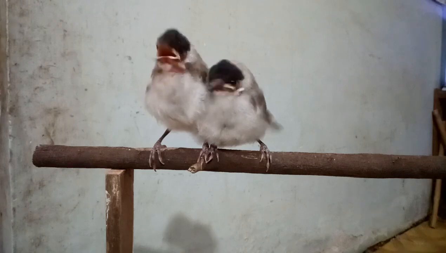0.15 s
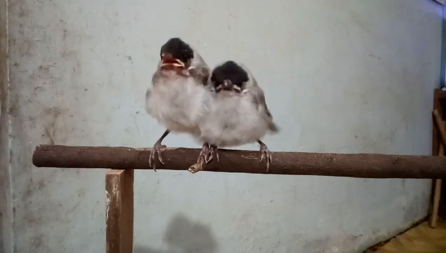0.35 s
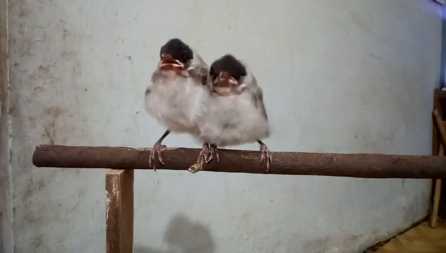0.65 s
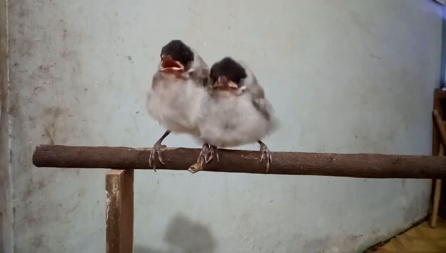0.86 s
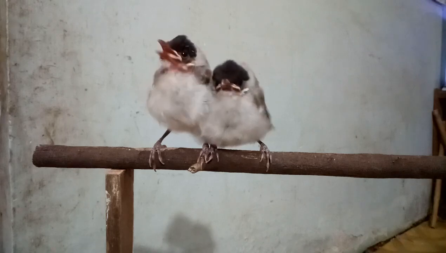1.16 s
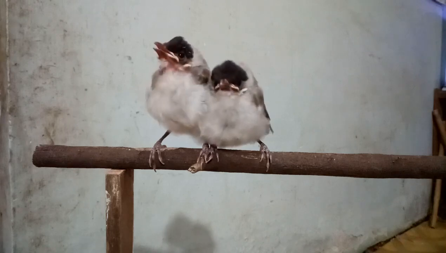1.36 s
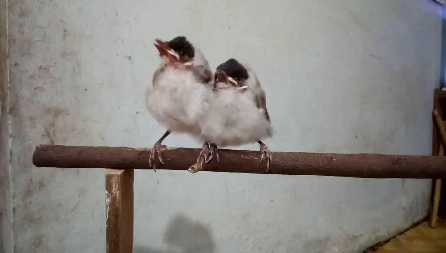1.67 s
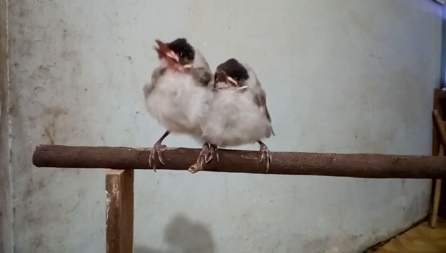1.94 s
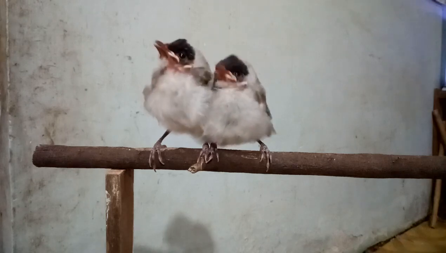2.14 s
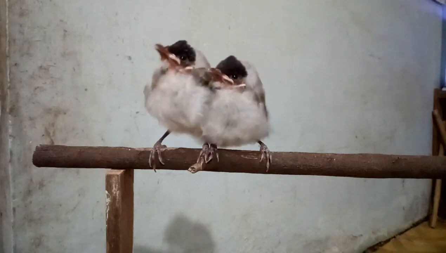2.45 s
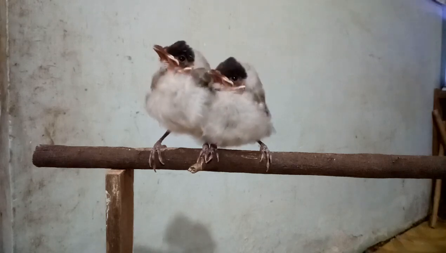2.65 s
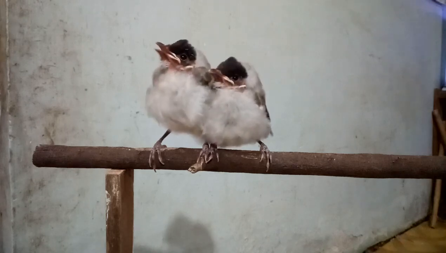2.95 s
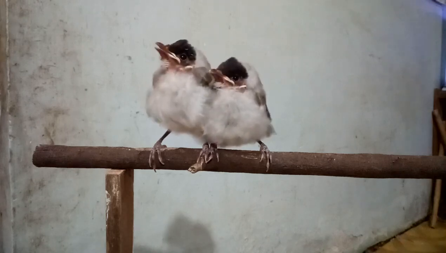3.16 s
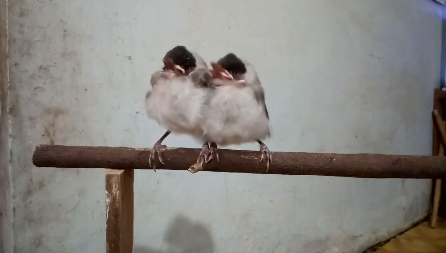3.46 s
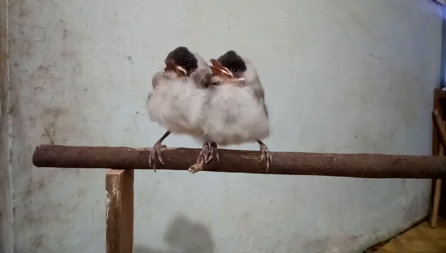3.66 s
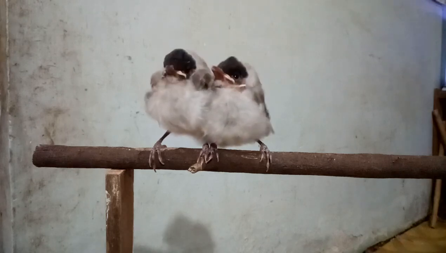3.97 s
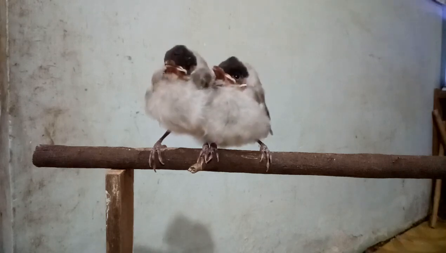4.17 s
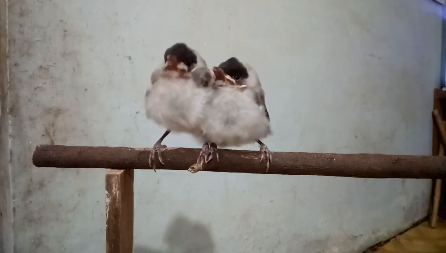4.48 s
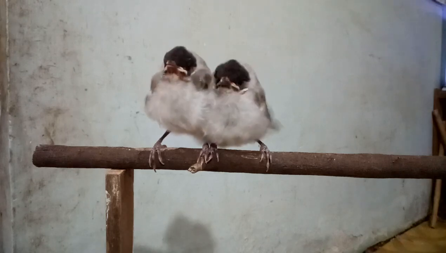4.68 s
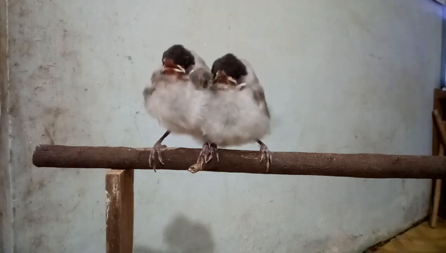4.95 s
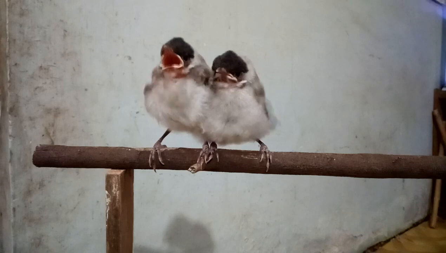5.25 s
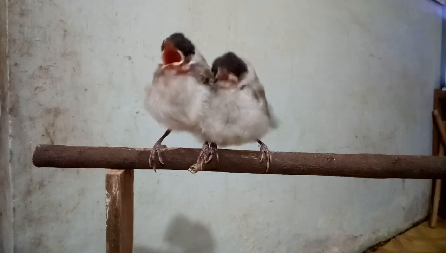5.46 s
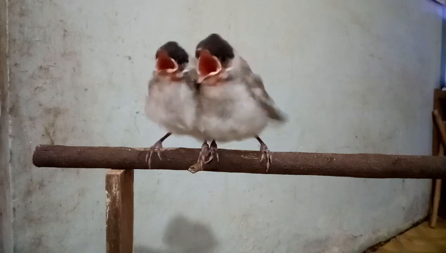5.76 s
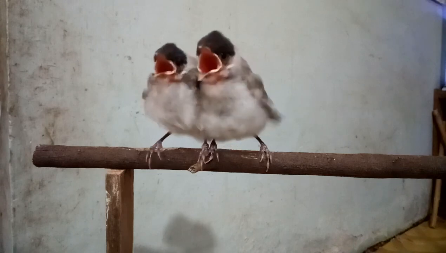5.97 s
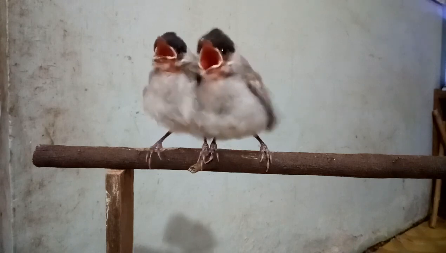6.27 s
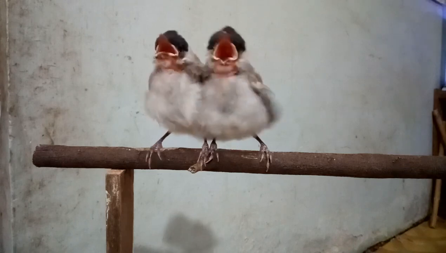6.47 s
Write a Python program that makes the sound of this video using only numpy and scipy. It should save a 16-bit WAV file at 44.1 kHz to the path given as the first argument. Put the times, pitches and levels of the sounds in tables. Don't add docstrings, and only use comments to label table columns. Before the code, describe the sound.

Two young birds on a wooden perch beg close to a phone microphone in a small bare room. One gives short shrill chirps, several a second with uneven gaps, varying between clear whistles, rising notes and raspy warbled cheeps. Near the end a second, fainter bird joins in and a soft bump sounds on wood. A steady low hum with slight buzz continues beneath.

```python
import sys
import numpy as np
from scipy import signal
from scipy.fft import rfft, irfft, next_fast_len
from scipy.io import wavfile
from scipy.ndimage import uniform_filter1d

SR = 44100
rng = np.random.default_rng(int(sys.argv[2]) if len(sys.argv) > 2 else 0)


def unload_wav(signal):
    wavfile.write(
        sys.argv[1],
        SR,
        np.round(np.clip(np.atleast_2d(signal).T, -1, 1) * 32767).astype(np.int16),
    )


def level_to_linear(level):
    exponent = np.asarray(level, float) / 20
    return 10 ** exponent


N = 291942
LEAD = 9000

# start in seconds, length in seconds, voice pitch in Hz, level in dB,
# pitch glide over the call as a share.
WHISTLES = [
    (.803, .055, 1881, -20, .05),
    (2.335, .053, 1945, -20.5, .06),
    (3.652, .05, 1913, -19.5, -.05),
    (5.053, 0.0524, 1888, -21, 0.013),
]
RISERS = [
    (1.866, 0.07, 1715, -19.5, .24),
    (3.083, .075, 1707, -23.5, .08),
    (4.243, .085, 1660, -21.5, .09),
]
SCOOPS = [(.269, 0.074, 1419, -22.5, 0.023), (2.182, 0.078, 1402, -19.5, 0.021),
          (2.438, 0.068, 1370, -18.5, 0.00099), (3.467, 0.078, 1391, -19, -.04),
          (4.448, .077, 1452, -19.5, -0.025), (4.645, 0.067, 1422, -18, .06)]
RATTLES = [(.897, 0.1, 1724, -23, .05), (3.812, 0.061, 1612, -20, -.04), (3.992, 0.051, 1495, -20, .02),
           (5.222, 0.08, 1662, -21, .15), (5.404, 0.091, 1489, -22, 0.048)]
DIVES = [(2.006, .066, 1557, -22.5, .04), (2.507, .059, 1571, -19.5, .01), (2.715, .053, 1415, -18, -.06),
         (6.437, .055, 1452, -21.5, -0.021)]
RASPS = [(-.17, .09, 1560, -26.5, .05), (.084, .08, 1400, -26.5, -.1), (1.085, .084, 1550, -20, .04),
         (1.305, .075, 1432, -23.5, -.11), (3.277, .072, 1515, -23, -.02), (5.607, .087, 1430, -23.5, -.09),
         (5.797, .079, 1450, -26.5, .01), (6.612, .05, 1718, -24, .01)]
SIBLING = [
    (6.158, 0.05, 2052, -31, 0.06),
    (6.28, .054, 1914, -31, .13),
    (6.35, .063, 1816, -25.5, 0.073),
    (6.496, 0.033, 1973, -26.5, -0.0095),
]

# pitch factor, level in dB, rasp in dB against the tone.
WHISTLE_SHAPE = [(1.14, -15, -4.5), (1.055, -7, -12), (.98, 0.5, -31.5), (.985, -0.2, -28.5),
                 (1.035, -1.5, -31), (.95, -4, -24)]
RISER_SHAPE = [(1.35, -23.5, -4), (0.88, -10.5, -3), (.99, -5.5, -10.5), (.985, -3, -17), (.98, -1.5, -20),
               (1.025, 1, -27.5), (1.005, -8.5, -28.5)]
SCOOP_SHAPE = [(1.57, -16, -8), (1.14, -8.5, -9), (.9, -4, -23.5), (1.04, 0, -24), (1.01, -3, -25),
               (1.01, -2.5, -25.5), (.96, 0.5, -19)]
RATTLE_SHAPE = [(1.06, -15, -9.5), (.99, -4, -9), (1.005, -1.5, -16.5), (.98, -0.3, -14.5),
                (.98, -1, -20.5), (1.02, -3.5, -18)]
DIVE_SHAPE = [(1.42, -10.5, -11.5), (.97, -4.5, -8), (.99, -2, -19.5), (.995, -1.8, -18.5),
              (1.01, -1.5, -19), (.99, -10, -16)]
RASP_SHAPE = [(1.27, -16.5, -3.5), (1.04, -7.5, -0.6), (1.01, -2.5, -7), (.99, 0, -14.5), (.98, 0.9, -17),
              (1.01, -6, -17.5)]
SIBLING_SHAPE = [(0.47, -3.5, -1), (1.01, -8, -4), (.99, -1, -13), (.995, -0.5, -22.5), (1.02, -5.5, -20.5)]

# calls, shape, lead-in in seconds, settling in seconds,
# partials 1, 3, 4 and 6 in dB against partial 2.
KINDS = [
    (WHISTLES, WHISTLE_SHAPE, .011, .013, -28.5, -30.5, -17, -38),
    (RISERS, RISER_SHAPE, 0.021, 0.0073, -23.5, -38.5, -20, -40),
    (SCOOPS, SCOOP_SHAPE, .011, .013, -26, -26.5, -15.5, -31),
    (RATTLES, RATTLE_SHAPE, .011, .013, -27, -31, -13, -29.5),
    (DIVES, DIVE_SHAPE, 0.012, .013, -24, -33, -15.5, -29),
    (RASPS, RASP_SHAPE, .011, .013, -23.5, -32, -15, -28.5),
    (SIBLING, SIBLING_SHAPE, .011, .012, -22.5, -25.5, -26, -74),
]

# time in seconds, partial 4 in dB.
FACING = [(0, 3), (.3, 7), (.9, 3), (1.3, 1), (2.0, -6), (2.2, 1.5), (2.45, -10), (2.55, 2.5), (2.75, -4.5),
          (3.1, 4.5), (3.3, -4.5), (3.85, -0.5), (4.3, -5), (4.7, -8.5), (5.25, 4.5), (5.45, 2.5),
          (5.65, 9.5), (6.62, 6.5)]

# first in seconds, last in seconds, count,
# first rise as a share, last rise as a share.
WARBLES = [(-.145, -.085, 6, 0.3, .3), (0.12, 0.149, 3, .2, 0.35), (0.943, 0.986, 5, .16, 0.31),
           (1.1192, 1.156, 3, 0.036, 0.27), (1.355, 1.371, 2, .12, 0.179), (2.03, 2.062, 3, 0.28, .27),
           (2.5171, 2.5609, 5, .16, .3), (2.7342, 2.7578, 3, 0.14, .22), (3.304, 3.3393, 5, 0.068, 0.22),
           (3.824, 3.8618, 5, .15, .3), (4.0065, 4.046, 5, .17, 0.29), (4.484, 4.5132, 2, 0.083, .18),
           (4.6948, 4.7132, 2, 0.22, 0.28), (5.2333, 5.2957, 7, 0.3, .09), (5.4186, 5.494, 8, 0.23, 0.19),
           (5.631, 5.6774, 6, .15, 0.29), (5.822, 5.876, 7, 0.22, 0.29), (6.182, 6.187, 2, 0.056, .13),
           (6.2912, 6.3244, 4, .31, .22), (6.383, 6.416, 4, .17, .11), (6.4494, 6.48, 4, .35, .25),
           (6.5035, 6.523, 2, .08, 0.14)]

# frequency in Hz, gain in dB.
THROAT = [(900, -30), (1500, -12), (2250, -6), (2700, -9.5), (4400, 9), (5150, -4), (5900, 6), (7500, -6),
          (8400, -13), (10000, 0.5), (15000, -28)]

# frequency in Hz, gain in dB.
RASP_COLOUR = [(1300, -32.5), (2000, -11.5), (2600, -6), (3300, 2.5), (4300, 11.5), (5200, -7),
               (6300, -5.5), (8300, -30.5), (10500, -33), (13000, -33), (15500, -53.5)]

# start in seconds, length in seconds,
# start pitch in Hz, end pitch in Hz, level in dB.
PEEPS = [(0.79, 0.023, 6200, 5300, -42.5), (0.88, 0.015, 4800, 4400, -42.5),
         (2.318, 0.035, 6450, 5500, -42), (3.005, 0.049, 4640, 4580, -73.5),
         (3.042, 0.048, 4460, 4240, -65.5), (3.64, 0.015, 5730, 5040, -47.5),
         (5.039, 0.014, 6670, 4830, -38), (5.212, 0.015, 5260, 4840, -41),
         (6.031, 0.064, 4400, 4330, -65.5), (6.032, 0.043, 2910, 2870, -64),
         (6.141, 0.018, 6800, 4880, -40.5), (6.2, 0.012, 3960, 2880, -46),
         (6.277, 0.012, 5640, 5340, -37.5)]

# band in Hz, T60 in seconds, level in dB.
ROOM_T60 = [(1000, 0.31, 2), (3240, 0.24, 1.5), (6200, 0.25, -5), (9600, 0.11, 1), (14100, 0.13, -1.5)]

# start in seconds, mode in Hz, T60 in seconds, level in dB.
KNOCKS = [
    (5.771, 552, .16, -45),
    (5.767, 1440, .045, -54),
]

# multiple of mains, level in dB, wobble depth from 0 to 1.
HUM = [
    (2, -38.5, 0.17),
    (4, -50.5, 0.26),
]

# frequency in Hz, level in dB.
WHINE = [(242, -65), (441, -70), (540, -79)]

# frequency in Hz, gain in dB.
BUZZ_COLOUR = [(300, -21), (550, -0.5), (700, -4), (850, -11.5), (1050, -20), (1400, -32.5), (2500, -41),
               (5000, -77.5)]

# time in seconds, level in dB.
BUZZ_LEVEL = [(0.0, -73), (0.41, -71.5), (1.77, -72), (2.23, -82), (2.91, -83), (3.96, -70.5), (5.4, -71),
              (5.9, -72.5), (6.27, -80.5), (6.62, -98)]

# frequency in Hz, gain in dB.
RUMBLE_COLOUR = [(25, -6.5), (60, -8), (140, 7), (260, -5), (450, -12), (700, -30), (1200, -36.5),
                 (2500, -38.5), (8000, -51), (16000, -48.5)]


def colour(x, points):
    size = next_fast_len(len(x) + 4096)
    hz, db = np.transpose(points)
    bins_hz = np.fft.rfftfreq(size, 1 / SR)
    gain = level_to_linear(np.interp(np.log(bins_hz + 1), np.log(hz), db))
    return irfft(rfft(x, size) * gain, size)[:len(x)]


def unit(x):
    return x / np.sqrt(np.mean(x ** 2))


def walk(rate_hz, size):
    hold = int(SR / rate_hz)
    steps = np.repeat(rng.standard_normal(size // hold + 1), hold)
    slewed = uniform_filter1d(uniform_filter1d(steps, hold), hold)
    return unit(slewed[:size])


def add(out, x, start):
    x = x[:len(out) - start]
    out[start:start + len(x)] += x


def chicks():
    size = N + LEAD
    tone, rasp = np.zeros(size), np.zeros(size)
    meander, tremble, shimmer = walk(220, size), walk(900, size), walk(400, size)
    all_flicks = flicks()
    for (stage_s, pitch_hz, db, rasp_db), (first_db, third_db, fourth_db, sixth_db) in calls():
        start = int(stage_s[0] * SR) + LEAD
        end_s = stage_s[-1] + 0.004
        t = stage_s[0] + np.arange(min(int((end_s - stage_s[0]) * SR), size - start)) / SR
        age_s = t - stage_s[0]
        cut = slice(start, start + len(t))
        rasp_share = level_to_linear(np.minimum(np.interp(t, stage_s, rasp_db), 0))

        flick = warble(t, all_flicks)
        unrest = 0.17 * rasp_share ** 2 + 0.08 * uniform_filter1d(flick - 1, size=600)
        sway = 0.035 * rasp_share * meander[cut]
        scatter = np.exp((0.0015 + unrest) * tremble[cut] + sway)
        hz = np.exp(np.interp(t, stage_s, np.log(pitch_hz))) * flick * scatter
        phase = 2 * np.pi * np.cumsum(hz) / SR

        odd_db = third_db + 90 * np.clip(np.log2(np.median(hz) / hz), -0.1, 0.15)
        partials_db = [first_db, 0, odd_db, fourth_db, odd_db / 2 - 18.5, sixth_db,
                       sixth_db - 13, sixth_db - 0.5, sixth_db - 15.5, sixth_db - 19]
        voice = 0
        for k, partial_db in enumerate(partials_db, 1):
            below_limit = k * hz < 0.45 * SR
            voice = voice + level_to_linear(partial_db) * below_limit * np.sin(k * phase)

        edge = np.clip(np.minimum(age_s / 0.005, (end_s - t) / 0.004), 0, 1)
        effort = edge * level_to_linear(np.interp(t, stage_s, db))
        tone[cut] += effort * np.sqrt(1 - rasp_share ** 2) * unit(voice) * level_to_linear(2.2 * shimmer[cut])
        rasp[cut] += 0.73 * effort * rasp_share * np.clip(age_s / 0.0048, 0, 1)
    air = unit(colour(rng.standard_normal(size), RASP_COLOUR))
    return colour(tone, THROAT) + rasp * air


def calls():
    for rows, shape, lead_s, settle_s, first_db, third_db, fourth_db, sixth_db in KINDS:
        factor, stage_db, rasp_db = np.transpose(shape)
        tone_s = lead_s + settle_s
        for start_s, length_s, hz, db, glide in rows:
            after_s = np.r_[0, lead_s, np.linspace(tone_s, length_s, len(shape) - 2)]
            progress = np.clip((after_s - tone_s) / (length_s - tone_s), 0, 1)
            pitch_hz = hz * factor * (1 + glide * (progress - 0.5))
            facing_db = np.interp(start_s + tone_s, *np.transpose(FACING))
            stages = start_s + after_s, pitch_hz, db + stage_db, rasp_db
            partials = (first_db + 0.54 * facing_db, third_db + 0.6 * facing_db,
                        fourth_db + facing_db, sixth_db + 1.3 * facing_db)
            yield stages, partials


def flicks():
    jitter_s, rise_spread = 0.001, 0.1
    out = []
    chances = rng.standard_normal((len(WARBLES), 2, 12))
    for (first_s, last_s, count, first_rise, last_rise), chance in zip(WARBLES, chances):
        place = np.linspace(0, 1, round(count))
        jitter = jitter_s * chance[0, :len(place)] * np.sin(np.pi * place)
        flick_s = first_s + place * (last_s - first_s) + jitter
        rise = first_rise + place * (last_rise - first_rise)
        out += zip(flick_s, rise * np.exp(rise_spread * chance[1, :len(place)]))
    return out


def warble(t, all_flicks):
    rise_s, fall_s = 0.004, 0.0065
    rise = np.zeros(len(t))
    for flick_s, share in all_flicks:
        if t[0] - 0.01 < flick_s < t[-1] + 0.01:
            up = np.cos(np.pi / 2 * np.clip((t - flick_s) / rise_s, -1, 0)) ** 2
            down = np.cos(np.pi / 2 * np.clip((t - flick_s) / fall_s, 0, 1)) ** 2
            rise = rise + 0.95 * share * up * down
    return np.exp(rise)


def peeps():
    out = np.zeros(N + LEAD)
    for start_s, length_s, start_hz, end_hz, db in PEEPS:
        hz = np.geomspace(start_hz, end_hz, int(length_s * SR))
        hz = hz * (1 + 0.012 * walk(900, len(hz)))
        whistle = np.hanning(len(hz)) * np.sin(2 * np.pi * np.cumsum(hz) / SR)
        add(out, level_to_linear(db) * whistle, int(start_s * SR) + LEAD)
    return out


def room():
    room_db, thicken_s = -5.5, 0.03
    t = np.arange(SR // 2) / SR
    present = rng.random(len(t)) < (t / thicken_s) ** 2
    echoes = rng.standard_normal(len(t)) * present / np.clip(t / thicken_s, 0.1, 1)
    hz, t60_s, db = np.transpose(ROOM_T60)
    tail = 0
    for k in range(len(hz)):
        band = [(f, 0 if j == k else -24) for j, f in enumerate(hz)]
        decay = np.exp(-np.log(1000) * t / t60_s[k])
        tail = tail + level_to_linear(db[k]) * colour(echoes, band) * decay
    response = level_to_linear(room_db) * tail * (t > 0.002) / np.sqrt(np.sum(tail ** 2))
    response[0] = 1
    return response


def knocks():
    out, t = np.zeros(N), np.arange(SR // 5) / SR
    for start_s, hz, t60_s, db in KNOCKS:
        envelope = (1 - np.exp(-t / 0.0014)) * np.exp(-np.log(1000) * t / t60_s)
        add(out, level_to_linear(db) * envelope * np.sin(2 * np.pi * hz * t), int(start_s * SR))
    return out


def appliance():
    mains_hz, shaft_hz, rumble_db = 49.95, 20.3, -53
    t = np.arange(N) / SR
    phase = 2 * np.pi * mains_hz * t
    wobble = np.sin(2 * np.pi * np.cumsum(shaft_hz * (1 + 0.038 * walk(2.2, N))) / SR)
    hum = 0
    for k, db, depth in HUM:
        level = level_to_linear(db + 0.4 * walk(2.9, N)) * np.sqrt(2)
        hum = hum + level * (1 + depth * wobble) * np.sin(k * phase - (k == 4) * np.pi / 2)
    whine = 0
    for hz, db in WHINE:
        level = level_to_linear(db + 1.8 * walk(14, N)) * np.sqrt(2)
        drifting_hz = hz * (1 + 0.0033 * walk(6, N))
        whine = whine + level * np.sin(2 * np.pi * np.cumsum(drifting_hz) / SR)
    ticks = np.diff(np.floor(mains_hz * t), prepend=0) * level_to_linear(1.3 * walk(52, N))
    rattle = unit(ticks) + 0.5 * rng.standard_normal(N)
    buzz_db = np.interp(t, *np.transpose(BUZZ_LEVEL)) + 4
    buzz = unit(colour(rattle, BUZZ_COLOUR)) * level_to_linear(buzz_db)
    rumble = unit(colour(rng.standard_normal(N), RUMBLE_COLOUR)) * level_to_linear(rumble_db + 0.62 * walk(5.6, N))
    return hum + whine + buzz + rumble


def scene():
    birds = signal.fftconvolve(chicks() + peeps(), room())[LEAD:LEAD + N]
    return (birds + knocks() + appliance())[None]


def roll_off(x):
    return signal.sosfilt(signal.butter(12, 15670, fs=SR, output="sos"), x)


def record(dry):
    return roll_off(dry)


dry = scene()
out = record(dry)
unload_wav(out)
```